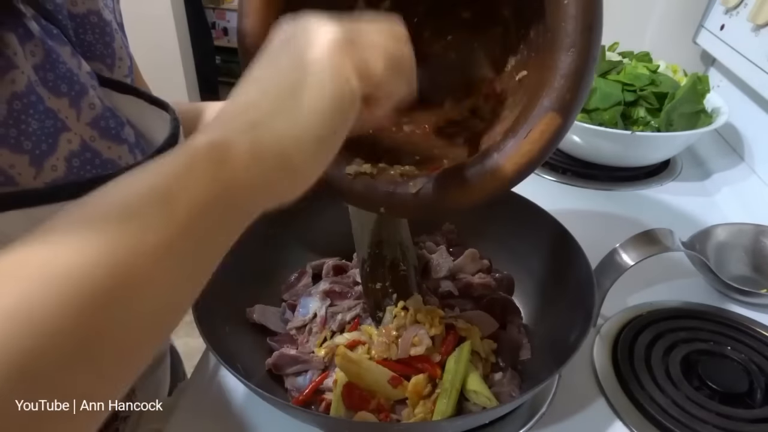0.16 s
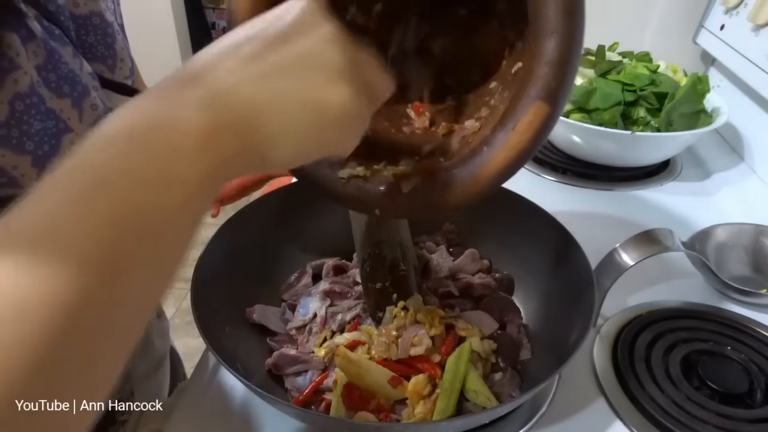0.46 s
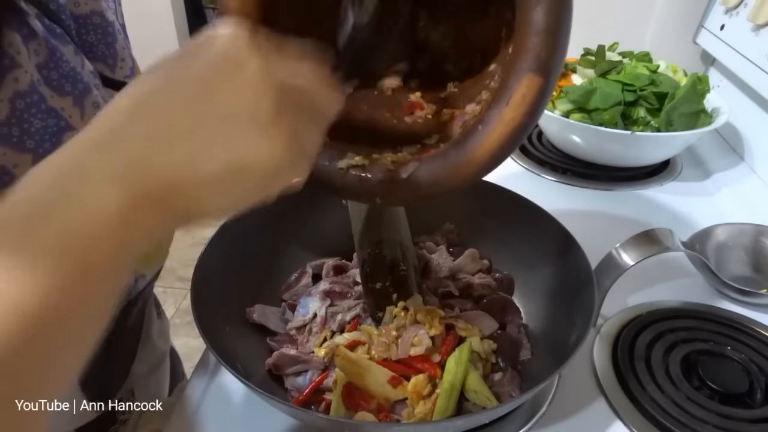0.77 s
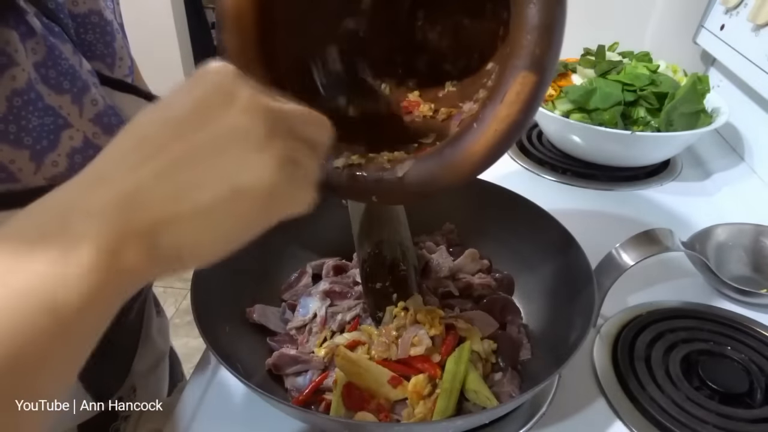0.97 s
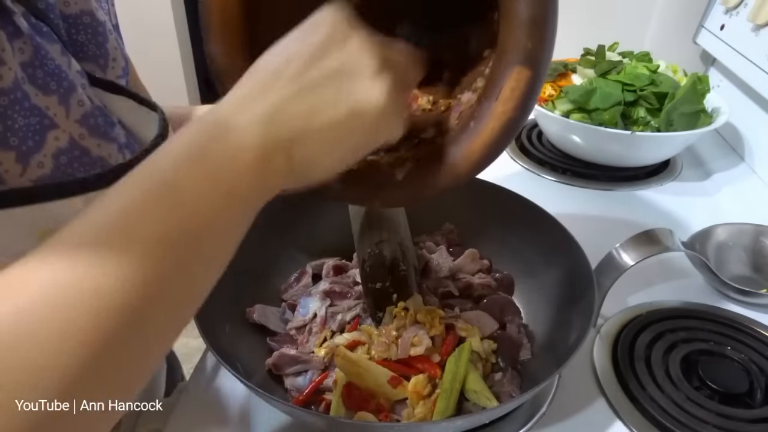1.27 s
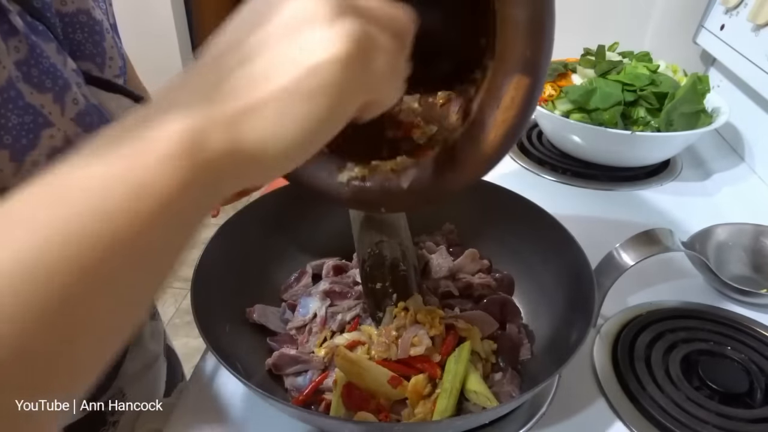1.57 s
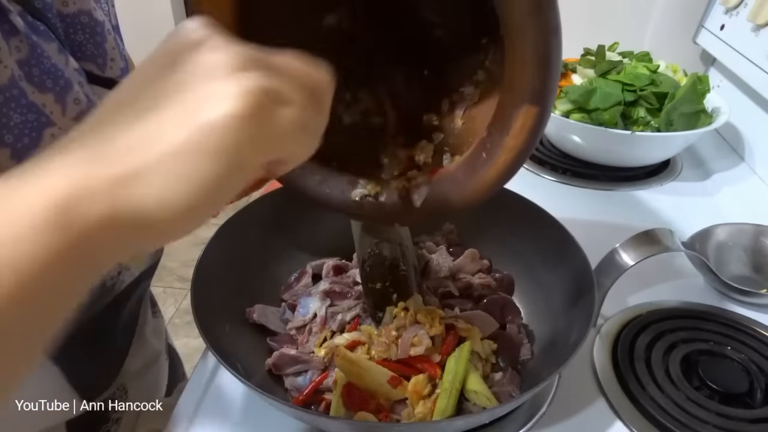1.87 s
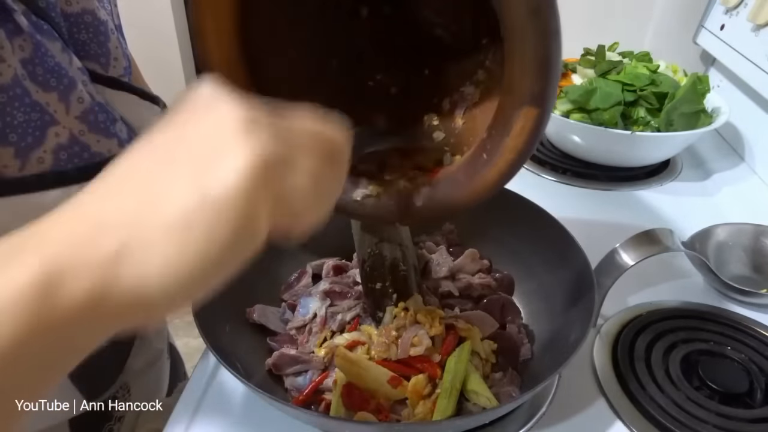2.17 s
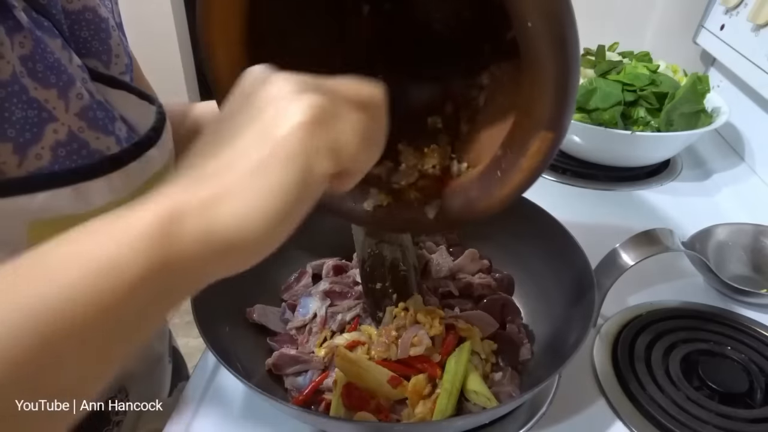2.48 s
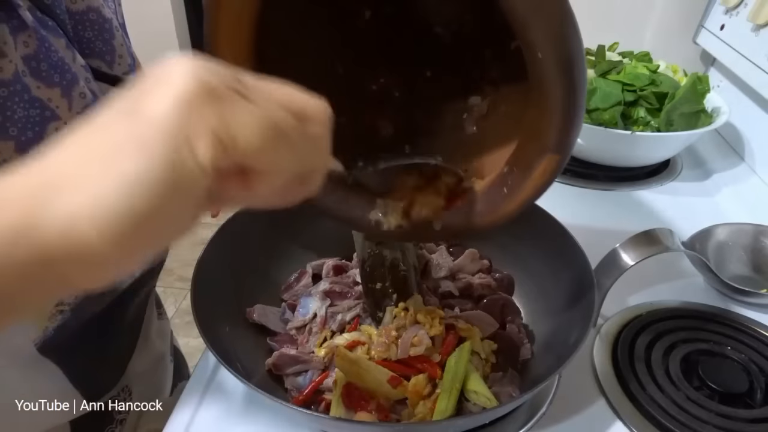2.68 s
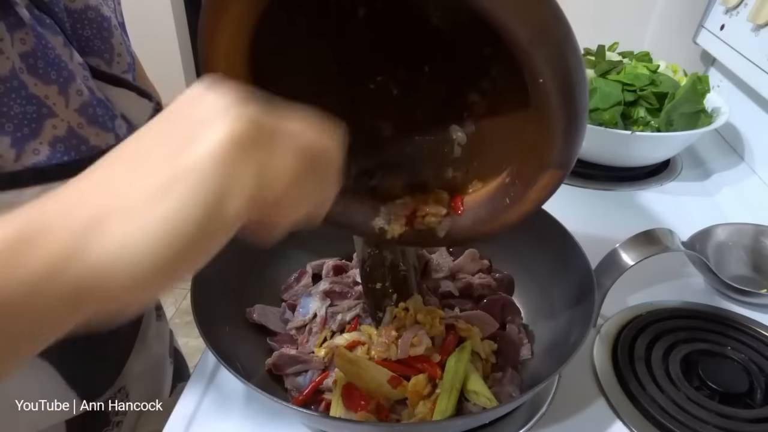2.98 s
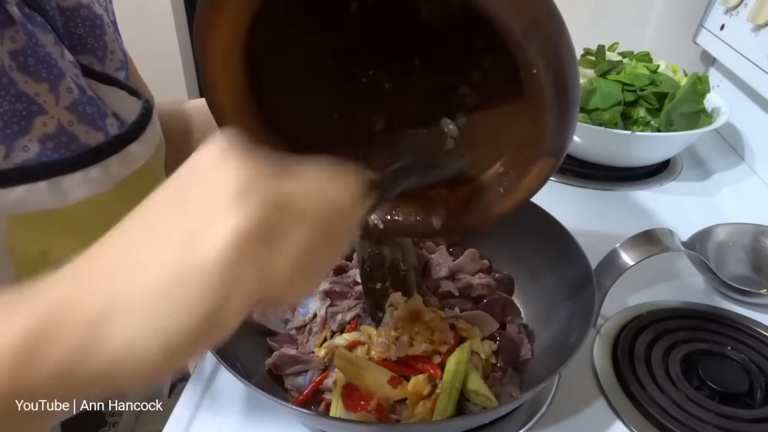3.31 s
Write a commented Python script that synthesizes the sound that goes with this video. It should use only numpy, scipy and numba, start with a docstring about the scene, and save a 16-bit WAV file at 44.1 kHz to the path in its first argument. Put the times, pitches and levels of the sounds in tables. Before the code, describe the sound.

A hard scraper scrapes and knocks inside a heavy mortar in quick, uneven strokes, kitchen close-up.

```python
"""A small kitchen with soft noise and a faint mains hum, sines and coloured noise, runs throughout.
A brief drag opens; then a scraper knocks on a heavy mortar held over a wok: clicks ring its modes, noise bursts
thud and crack. Drags among the knocks are random slips: scraper rings, bowl rasps and booms, a contact resonance
sinks towards the rim, wet paste crackles. Echoes trail the strokes; a limiter holds down the loud ones."""
import sys
import numpy as np
from scipy import signal
from scipy.fft import rfft, irfft
from scipy.io import wavfile
from scipy.ndimage import uniform_filter1d
from numba import njit

SR = 44100
rng = np.random.default_rng(int(sys.argv[2]) if len(sys.argv) > 2 else 0)


def persist_wave(psi):
    """Save psi, clipped to +-1, as 16-bit WAV."""
    counts = np.round(np.clip(psi, -1, 1) * 32767).astype(np.int16)
    wavfile.write(sys.argv[1], SR, np.atleast_2d(counts).T)


N = 152145
T = np.arange(N) / SR

# spectra, only the shape counts: hz, density_db (per Hz)
# kitchen noise
BACKGROUND_SPECTRUM = [(20, -0.5), (40, -2.5), (80, 3.5), (120, 8), (170, -0.5), (300, 1.5), (500, 1.5),
                       (800, -5.5), (1300, -5), (3000, -9.5), (6000, -20), (9500, -15.5), (11000, -40)]
# rasp and thud of the bowl
BOWL_SPECTRUM = [(150, -8), (300, -26), (480, -6), (700, -18), (950, -15.5), (1300, 17.5), (1600, 0),
                 (2000, 8.5), (2900, 9.5), (3700, 0), (5200, -32), (10000, -26.5)]
# boom of the bowl's hollow
HOLLOW_SPECTRUM = [(150, -38.5), (250, -9.5), (340, -6), (430, -0.5), (520, 5), (600, 0.5), (800, -8.5),
                   (1500, -53)]
# crackle and wet crack of the paste
PASTE_SPECTRUM = [(1500, -38.5), (3000, 4.5), (4300, 8.5), (5200, 1), (6200, 4.5), (7600, -3.5),
                  (9000, 1.5), (10200, -7.5), (11000, -24.5)]
# stereo balance of the mortar: time_s, left_minus_right_db
BALANCE = [(.2, -1), (.65, -0.5), (1.1, -0.5), (1.5, -0.5), (1.95, 0.4), (2.4, -1.5), (3.2, 0.5)]
# scraper modes: hz, width_hz, drag_level_db, knock_level_db
SCRAPER_MODES = [(530.3,12.8,-21.5,-19), (975,19.4,-20,-28), (1231,14.4,0,-12.5), (1290,20,-8,-26),
                 (1505,21,-14.5,-15), (1888,39,-8.5,-64), (1935,25,-46,-19.5), (2245,17,-23,-39),
                 (3137,31,-4,3), (3190,20,-16,-3.5), (4550,30,-16.5,-10), (4345,43,-42,-14.5),
                 (5954,15,-18,-53), (9010,23,-44,-53), (9500,20,-29.5,-54)]
# scraper knocking on the wall: start_s, low_modes_db, high_modes_db, bowl_thud_db, wet_crack_db
KNOCK_EVENTS = [(0.1167,2,2.5,11,23), (0.181,-6,9.5,24.5,0), (0.2027,-22,7,-8,-5), (0.214,-1,0,19,-5),
                (0.3949,7.5,-1,1,27.5), (0.45,4.5,-21,-3,3), (0.4715,6,-8,-4,15), (0.652,-2,-1,12.5,17.5),
                (0.7381,-2,-7,7,9.5), (0.7868,4,-14,2,14), (0.8048,-7,-8.5,-13,13), (0.8296,-5,-18,11.5,4),
                (0.961,5,-0.5,-34,16), (1.035,-1,-12,-2,17.5), (1.049,-1,-5,-3,5), (1.0934,-13,-1.5,12,14),
                (1.2974,-26,-11,0,17.5), (1.3135,-9,-20,-7,-6), (1.3847,3,-29,11,15), (1.526,4,-5,-20,-17),
                (1.758,6.5,8,19,-21), (1.7883,-13,-6.5,-24,-15), (1.8461,-11,-11,2,12.5),
                (1.8684,2,-16,19,16), (1.91,-4,-2.5,0,-5), (2.063,10,2,17.5,27), (2.0842,7.5,-3.5,5,25),
                (2.2389,-20,4,-15.5,-3.5), (2.5131,4.5,-1,15.5,9), (2.55,-12,-3,-2,-5),
                (2.7228,-20,-6,13,-11), (2.782,-10,-14,-11,-9), (3.049,3,11,26,21), (3.104,4,-2,22,-5)]
# scraper dragged along the wall: start_s, end_s, swell_s, low_modes_db, high_modes_db,
# rasp_db, crackle_db, hollow_db, contact_db, contact_start_hz
DRAG_EVENTS = [(0,.015,0.001,-9.5,-4.5,-7.5,-8.5,-5.5,-10,1850), (.122,.176,0.0024,-4,11,-13,4,5,-3,2060),
               (.18,.232,0.0037,3.5,15.5,-2,1.5,4,7,1990), (.232,.28,.004,-14,-1.5,-6.5,-12,-30,-16,1950),
               (.398,.46,.004,-6,6.5,1,2.5,6.5,-32,2320), (.471,.538,0.0035,1.5,8.5,5,2,-26,2,1970),
               (.655,.7,0.0022,-5.5,4,-8,-6,-2.5,-7,2080), (.712,.757,0.035,-4,11,2,7,-6,8.5,1945),
               (.787,.82,0.001,6,-6,2,4,2,-2,1760), (.966,1.03,0.0086,-3,7.5,-3,-1.5,0.5,-35,2120),
               (1.036,1.132,.005,-4.5,1.5,-5.5,5.5,-5,-35,2320),
               (1.298,1.32,0.0041,-7.5,-6,-26,7.5,7,6.5,2410),
               (1.33,1.395,0.034,-20,-11,-27,-1.5,-2.5,-13,2040),
               (1.398,1.462,0.0019,0,9,3,6.5,0,10.5,1850), (1.464,1.532,0.0018,6,5.5,6.5,11.5,-28,4.5,1920),
               (1.78,1.828,0.003,-3,7,3,-1,-4,3,2010), (1.871,1.92,0.0064,3,8,1.5,3.5,-9,1.5,2260),
               (2.086,2.112,0.0027,-8,-25,-24,7.5,3.5,-3.5,2260),
               (2.15,2.213,0.022,0.5,15.5,9.5,6.5,-26,-3,2040), (2.218,2.3,0.0027,4,12,4,5,-24,5.5,2110),
               (2.535,2.655,0.0067,3,7,2.5,0,-33,-20,2600), (2.657,2.735,0.0019,10,11,10,7.5,-13,7.5,2360),
               (2.735,2.797,0.0016,-6,-11,-3,4.5,9,7,2010),
               (3.052,3.098,0.0024,12.5,17.5,6.5,-2,-1,-10,2100),
               (3.103,3.158,.003,4.5,6.5,1.5,-0.5,1.5,-2,2000)]

BACKGROUND_DB, BACKGROUND_SIDE_DB = -46.5, -19
HUM_HZ, HUM_RMS_DB = 118.6, -53.5

EARLY_T60_S, EARLY_DELAY_S, EARLY_SIDE_DB = 0.013, 0.0011, -15
ROOM_T60_S, ROOM_DELAY_S, ROOM_DB, ROOM_SIDE_DB = 0.3, 0.012, -13, -5

HIGH_MODES_HZ = 2500  # modes above this follow high_modes_db
PASTE_SIDE_DB = 0.5

KNOCK_RING_DB, KNOCK_THUD_DB, KNOCK_CRACK_DB = 37, -8, -15
RING_ONSET_LOWPASS_HZ = 4800  # softens the onset of the knock ring
BURST_FALL_S, BURST_RISE_S = 0.0069, 0.00085  # time constants
KNOCK_SPREAD_DB, KNOCK_DETUNE_RATIO = 0.5, 0.0013  # rms

RELEASE_S, SINK_OCT_PER_S, CONTACT_WIDTH_HZ = 0.0033, 1.8, 183
SLIPS_PER_S, SLIP_SPREAD_DB = 3500, 3.5
CRACKLES_PER_S, CRACKLE_SPREAD_DB = 3000, -16
CHATTER_RMS_DB, CHATTER_HZ = 2.0, 89
MODE_WANDER_RATIO, WANDER_HZ = 0.0059, 16  # modes shift as the contact moves
RING_DB, RASP_DB, CRACKLE_DB, CONTACT_DB, HOLLOW_DB = -23, -23.5, -31.5, -26, -40

LIMIT_DB, LIMIT_RELEASE_DB_PER_S, LIMIT_WINDOW_S = -13.5, 191, 0.012
OUTPUT_DB, CUTOFF_HZ = -2.3, 10900


def from_db(db):
    """Decibels to amplitude."""
    return 10 ** (np.asarray(db) / 20)


def rms_one(x):
    """Scale to rms 1."""
    return x / np.sqrt(np.mean(x ** 2) + 1e-20)


def drift(corner_hz):
    """Slow random motion of rms about 1: noise through two equal one-pole lowpasses."""
    pole = np.exp(-2 * np.pi * corner_hz / SR)
    noise = rng.standard_normal(N + SR)  # the first second settles the filter
    return rms_one(signal.sosfilt([1, 0, 0, 1, -2 * pole, pole * pole], noise)[SR:])


def colour(x, spectrum, size=2048):
    """Minimum-phase filter of unit power gain with the given spectrum."""
    hz, db = np.transpose(spectrum)
    bin_hz = np.arange(size + 1) * SR / 2 / size
    gain = rms_one(from_db(np.interp(np.log(bin_hz + 1), np.log(hz), db)))
    cepstrum = irfft(np.log(gain))
    cepstrum[1:size] *= 2
    cepstrum[size + 1:] = 0
    impulse = irfft(np.exp(rfft(cepstrum)))
    return signal.fftconvolve(x, impulse)[:N]


@njit
def resonate(x, hz, width_hz):
    """Resonance with a moving centre and peak gain near 1: a decaying complex rotation."""
    out, z, decay = np.zeros(len(x)), 0j, np.exp(-np.pi * width_hz / SR)
    for i in range(len(x)):
        z = z * decay * np.exp(2j * np.pi * hz[i] / SR) + x[i] + 1e-18
        out[i] = 2 * (1 - decay) * z.real
    return out


def noise_gain(width_hz):
    """Makes up for the power a resonance of this width takes from white noise."""
    return np.sqrt(SR / np.pi / width_hz)


def grains(rate_per_s, spread_db):
    """Random clicks of uneven size and sign; rms 1."""
    size_db = spread_db * np.minimum(rng.exponential(1, N), 4)
    sizes = from_db(size_db) * rng.choice([-1, 1], N)
    return rms_one(sizes * (rng.random(N) < rate_per_s / SR))


def spread(mid, side, side_db):
    """Left and right from a common and an opposed part."""
    return mid + from_db(side_db) * side * np.array([[1], [-1]])


def background():
    """Soft kitchen noise, nearly mono, and mains hum as one sine."""
    mid, side = [colour(rng.standard_normal(N), BACKGROUND_SPECTRUM) for _ in range(2)]
    noise = from_db(BACKGROUND_DB) * spread(mid, side, BACKGROUND_SIDE_DB)
    hum = from_db(HUM_RMS_DB) * np.sqrt(2) * np.sin(2 * np.pi * HUM_HZ * T)
    return noise + hum


def reflections(x, t60_s, delay_s):
    """Dense dying cloud of echoes: convolution with decaying noise of unit energy."""
    t = T[:SR // 2]
    tail = rng.standard_normal(len(t)) * from_db(-60 * t / t60_s) * (t > delay_s)
    return signal.fftconvolve(x, tail / np.sqrt(np.sum(tail ** 2)))[:N]


def knock_clicks(start_s, db):
    """One single-sample impulse per knock."""
    return np.bincount((start_s * SR).astype(int), from_db(db), N)


def knock_burst(start_s, db, spectrum):
    """Coloured noise burst per knock, its onset cushioned by the paste."""
    fall, rise = np.exp(-1 / (np.array([BURST_FALL_S, BURST_RISE_S]) * SR))
    poles = np.convolve([1, -fall], [1, -rise])
    shape = signal.lfilter([1 - rise], poles, knock_clicks(start_s, db) + 1e-18)
    shape = shape / np.sqrt(BURST_FALL_S * SR / 2)
    return colour(shape * rng.standard_normal(N), spectrum)


def knocks():
    """Each impact rings the scraper's modes, slightly varied, with a bowl thud and a wet crack."""
    start_s, low_db, high_db, thud_db, crack_db = np.transpose(KNOCK_EVENTS)
    chance = rng.standard_normal((len(start_s), len(SCRAPER_MODES), 2))
    latest = np.maximum(np.searchsorted(start_s, T + 1 / SR) - 1, 0)  # knock now ringing
    ring = np.zeros(N)
    for k, (hz, width_hz, _, mode_db) in enumerate(SCRAPER_MODES):
        knock_db = high_db if hz > HIGH_MODES_HZ else low_db
        hits = knock_clicks(start_s, knock_db + mode_db + KNOCK_SPREAD_DB * chance[:, k, 0])
        mode_hz = hz * (1 + KNOCK_DETUNE_RATIO * chance[latest, k, 1])
        ring += resonate(hits, mode_hz, width_hz)
    ring = signal.sosfilt(signal.butter(3, RING_ONSET_LOWPASS_HZ, fs=SR, output="sos"), ring)
    thud = knock_burst(start_s, thud_db, BOWL_SPECTRUM)
    mid, side = [knock_burst(start_s, crack_db, PASTE_SPECTRUM) for _ in range(2)]
    crack = spread(mid, side, PASTE_SIDE_DB)
    return from_db(KNOCK_RING_DB) * ring + from_db(KNOCK_THUD_DB) * thud + from_db(KNOCK_CRACK_DB) * crack


def drag_forces():
    """Chattering envelope of each of the six drag layers, touch, and the sinking contact pitch."""
    force, contact_hz = np.zeros((6, N)), np.full(N, float(DRAG_EVENTS[0][-1]))
    for start_s, end_s, swell_s, *levels_db, start_hz in DRAG_EVENTS:
        swell = np.clip((T - start_s) / swell_s, 0, 1)
        shape = swell * np.exp(-np.maximum(T - end_s, 0) / RELEASE_S)
        force = np.maximum(force, from_db(levels_db)[:, None] * shape)
        dragged_s = np.clip(T, start_s, end_s) - start_s
        contact_hz = np.where(T >= start_s, start_hz * 2 ** (-SINK_OCT_PER_S * dragged_s), contact_hz)
    chatter = from_db(CHATTER_RMS_DB * drift(CHATTER_HZ))
    chatter = chatter / from_db(CHATTER_RMS_DB ** 2 * np.log(10) / 20)  # mean power about 1
    touching = np.minimum(force[1], 1)
    return force * chatter, touching, contact_hz


def dragged_scraper(slips, low, high, touching):
    """Slips ring the scraper's modes, which wander while it touches."""
    ring = np.zeros(N)
    for hz, width_hz, mode_db, _ in SCRAPER_MODES:
        drive = slips * (high if hz > HIGH_MODES_HZ else low)
        mode_hz = hz * (1 + MODE_WANDER_RATIO * touching * drift(WANDER_HZ))
        gain = from_db(mode_db) * noise_gain(width_hz) / np.sqrt(2)
        ring += gain * resonate(drive, mode_hz, width_hz)
    return ring


def contact_resonance(drive, contact_hz):
    """Slips ring one broad resonance that sinks along each drag."""
    glide = noise_gain(CONTACT_WIDTH_HZ) * resonate(drive, contact_hz, CONTACT_WIDTH_HZ)
    return signal.sosfilt(signal.butter(2, [1000, 3800], "band", fs=SR, output="sos"), glide)


def paste_crackle(force):
    """Wet paste: random clicks, independent in mid and side."""
    mid, side = [colour(force * grains(CRACKLES_PER_S, CRACKLE_SPREAD_DB), PASTE_SPECTRUM)
                 for _ in range(2)]
    return spread(mid, side, PASTE_SIDE_DB)


def drags():
    """Stick-slip friction drives scraper, bowl and contact resonance; paste crackles along."""
    forces, touching, contact_hz = drag_forces()
    low, high, rasp_force, paste_force, hollow_force, contact_force = forces
    slips = grains(SLIPS_PER_S, SLIP_SPREAD_DB)
    ring = from_db(RING_DB) * dragged_scraper(slips, low, high, touching)
    contact = from_db(CONTACT_DB) * contact_resonance(slips * contact_force, contact_hz)
    rasp_slips = grains(SLIPS_PER_S, SLIP_SPREAD_DB)
    rasp = from_db(RASP_DB) * colour(rasp_slips * rasp_force, BOWL_SPECTRUM)
    boom = from_db(HOLLOW_DB) * colour(slips * hollow_force, HOLLOW_SPECTRUM)
    crackle = from_db(CRACKLE_DB) * paste_crackle(paste_force)
    return boom + ring + contact + rasp + crackle


def scene():
    """Kitchen background, then the mortar, widened by echoes from bowl and stove top, in the room."""
    kitchen = background()
    balance_db = np.interp(T, *np.transpose(BALANCE)) * np.array([[.5], [-.5]])
    mortar = (knocks() + drags()) * from_db(balance_db)
    centre = mortar.mean(axis=0)
    near = spread(mortar, reflections(centre, EARLY_T60_S, EARLY_DELAY_S), EARLY_SIDE_DB)
    mid, side = [reflections(centre, ROOM_T60_S, ROOM_DELAY_S) for _ in range(2)]
    room = from_db(ROOM_DB) * spread(mid, side, ROOM_SIDE_DB)
    return kitchen + near + room


def record(dry):
    """Quick limiter with linear dB release, then a steep lowpass."""
    power = uniform_filter1d(np.mean(dry ** 2, axis=0), max(int(LIMIT_WINDOW_S * SR), 1))
    over_db = np.maximum(10 * np.log10(np.abs(power) + 1e-12) - LIMIT_DB, 0)
    release_db = LIMIT_RELEASE_DB_PER_S * T
    held_db = np.maximum.accumulate(over_db + release_db) - release_db
    limited = dry * from_db(OUTPUT_DB - uniform_filter1d(held_db, size=64))
    return signal.sosfilt(signal.ellip(10, .3, 70, CUTOFF_HZ, fs=SR, output="sos"), limited)


dry = scene()
out = record(dry)
persist_wave(out)
```